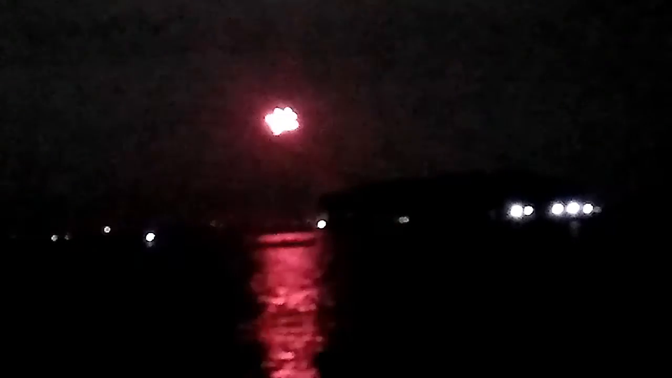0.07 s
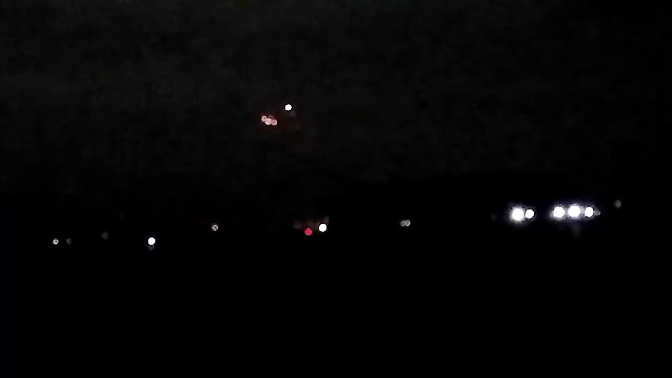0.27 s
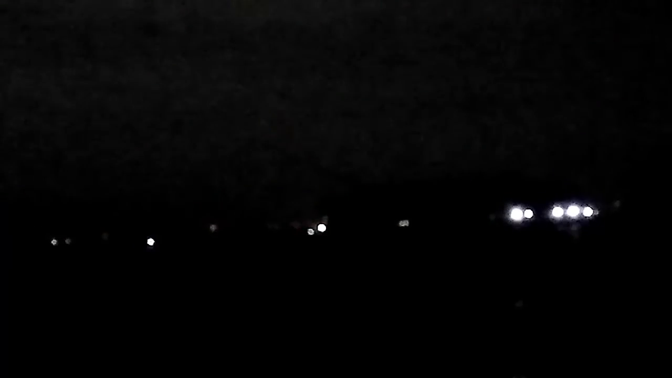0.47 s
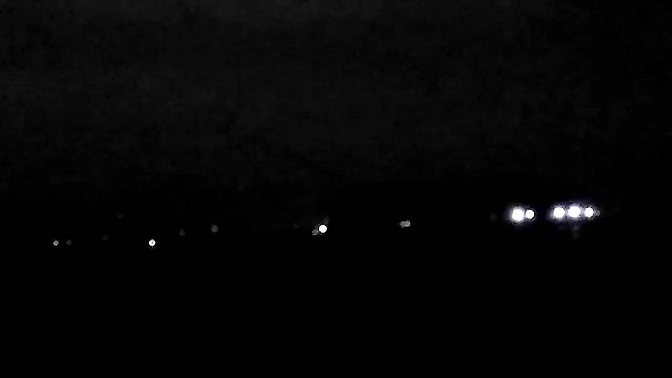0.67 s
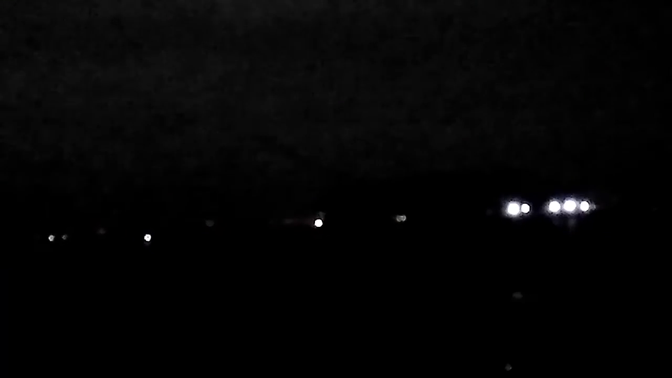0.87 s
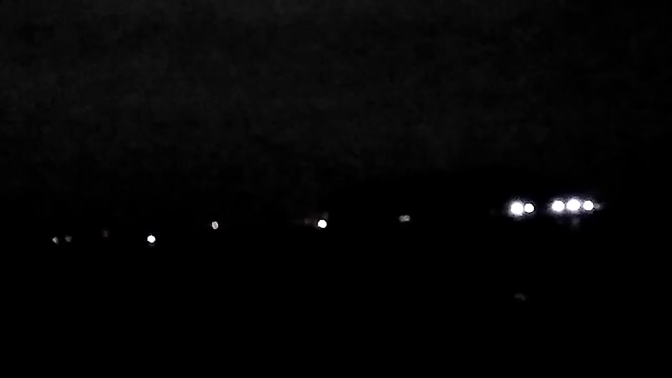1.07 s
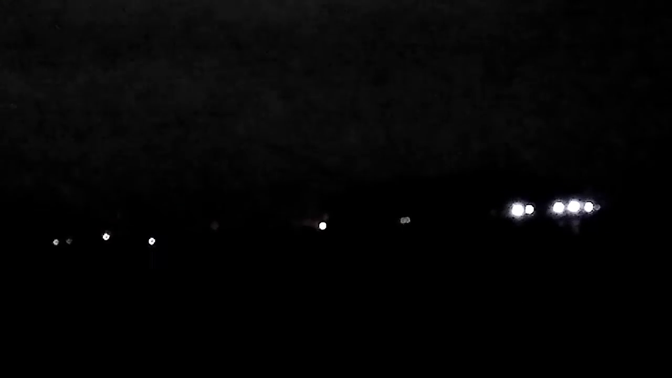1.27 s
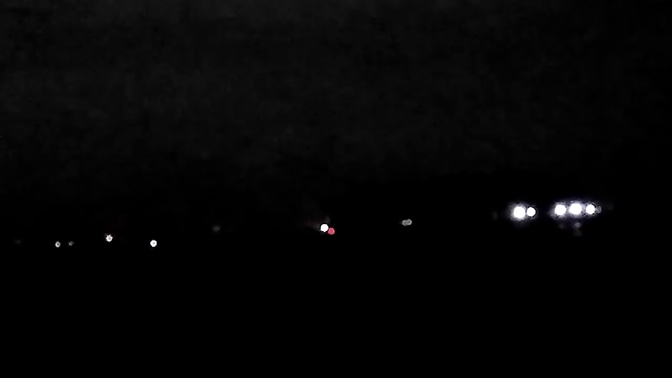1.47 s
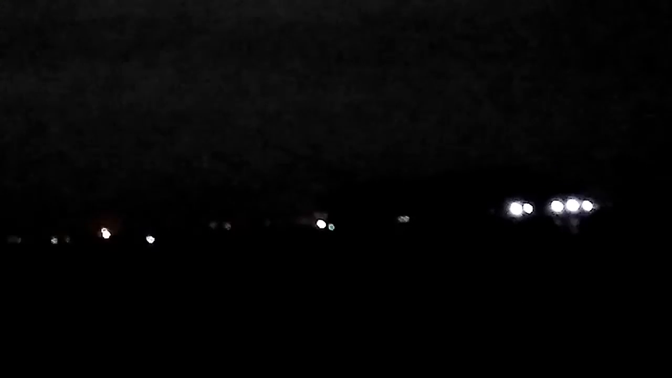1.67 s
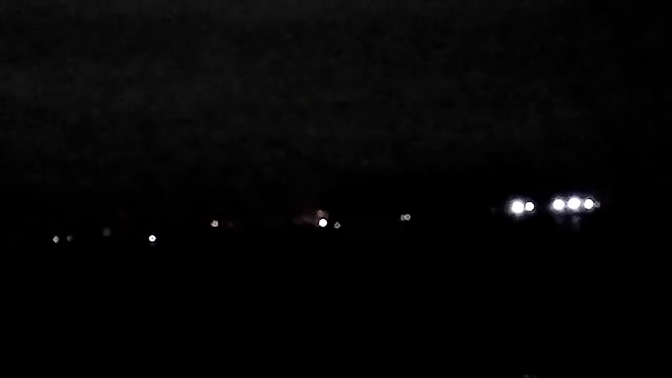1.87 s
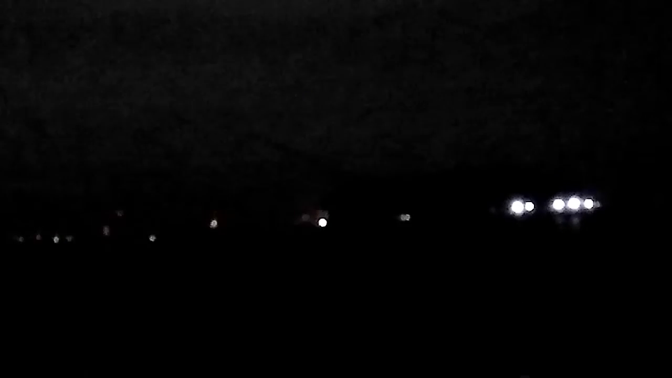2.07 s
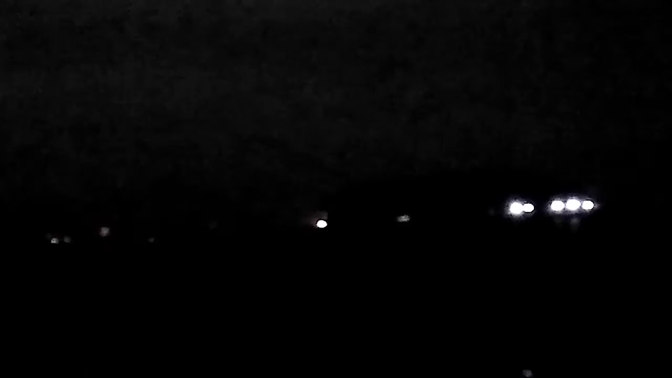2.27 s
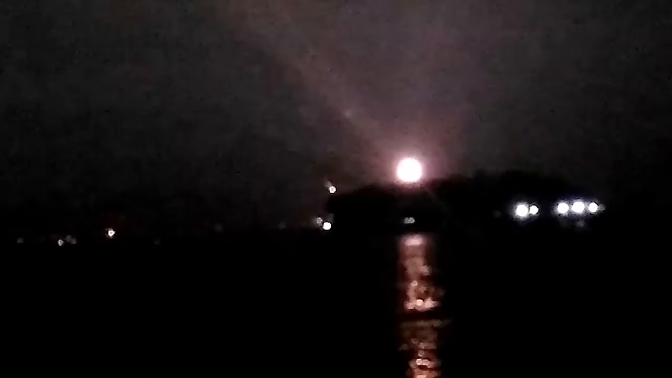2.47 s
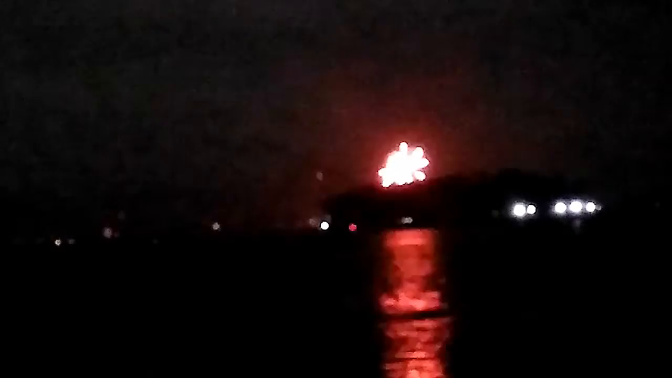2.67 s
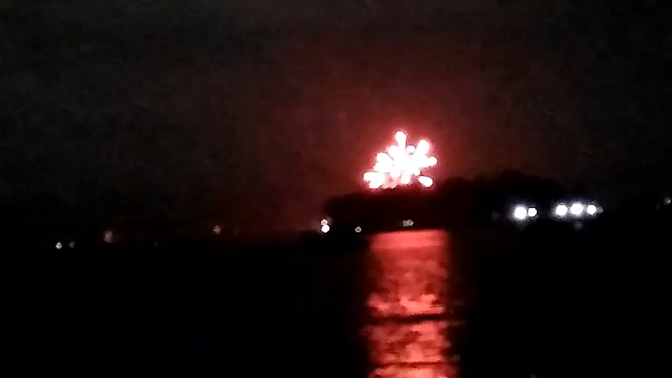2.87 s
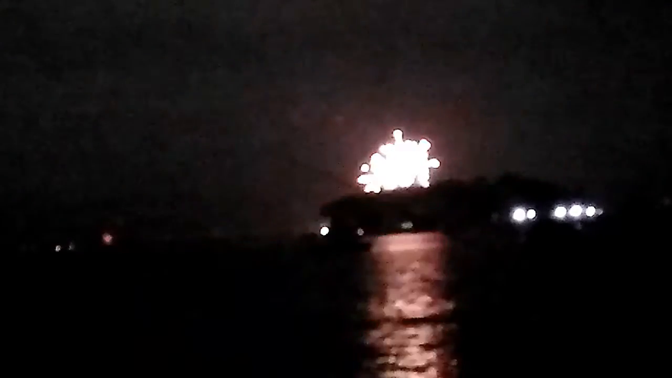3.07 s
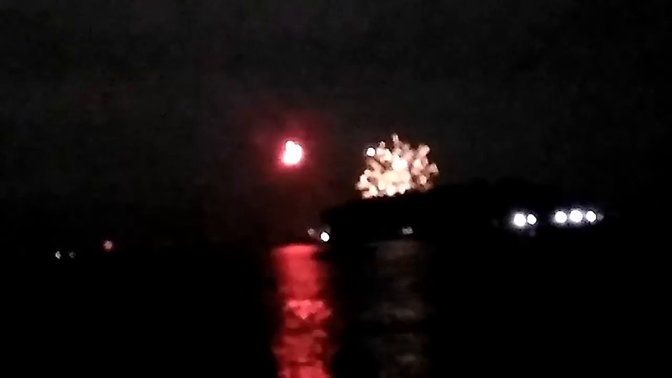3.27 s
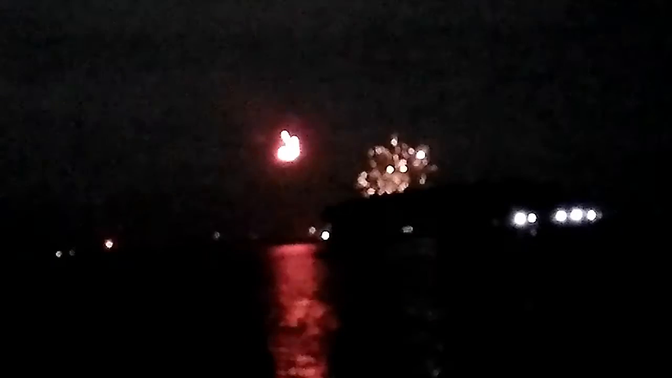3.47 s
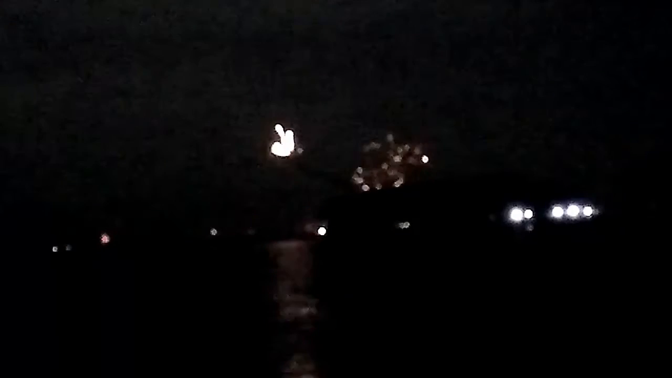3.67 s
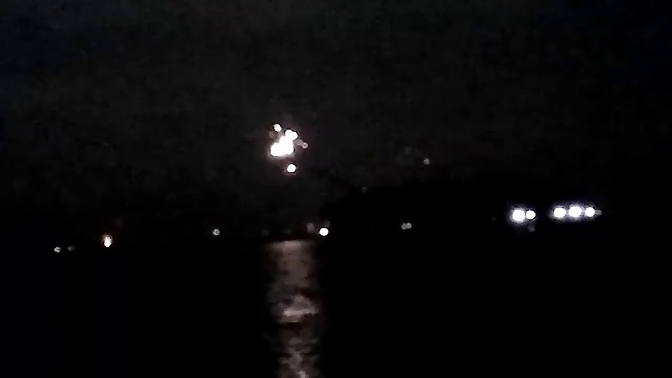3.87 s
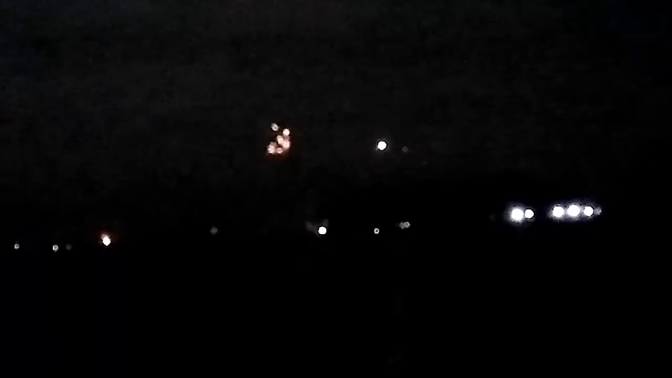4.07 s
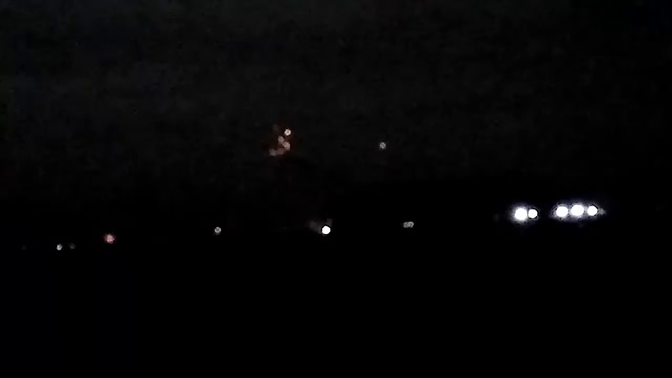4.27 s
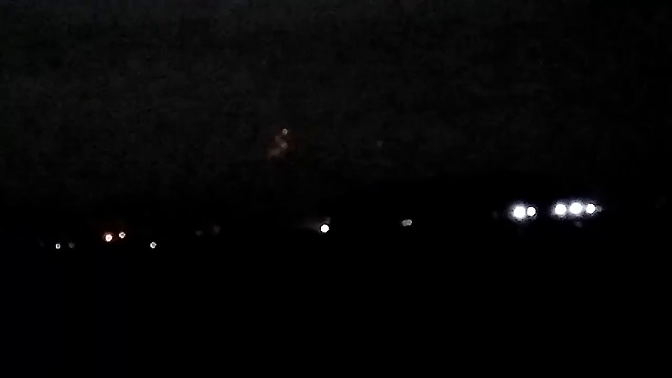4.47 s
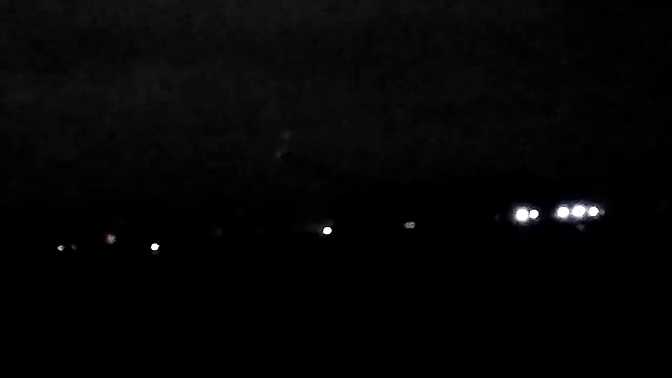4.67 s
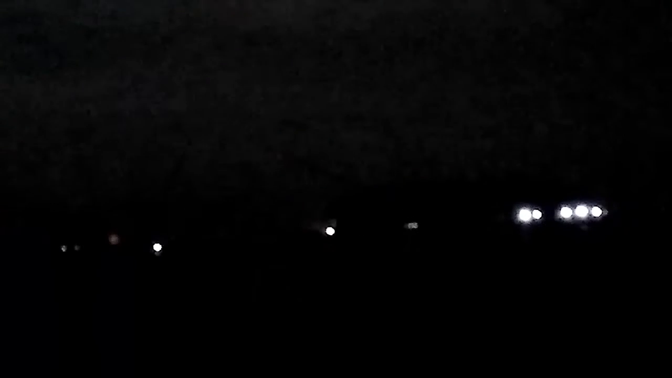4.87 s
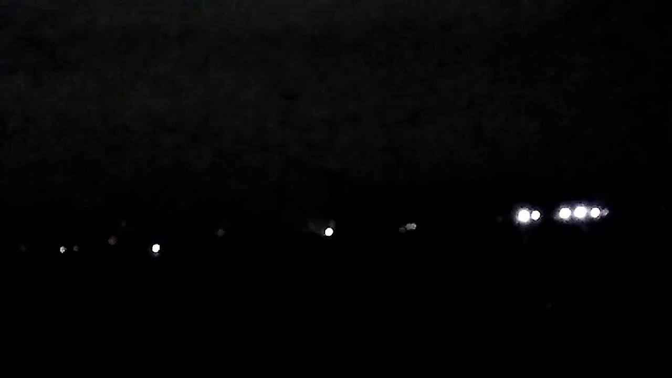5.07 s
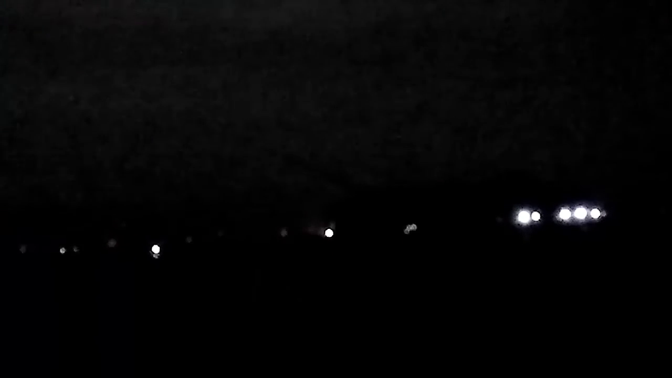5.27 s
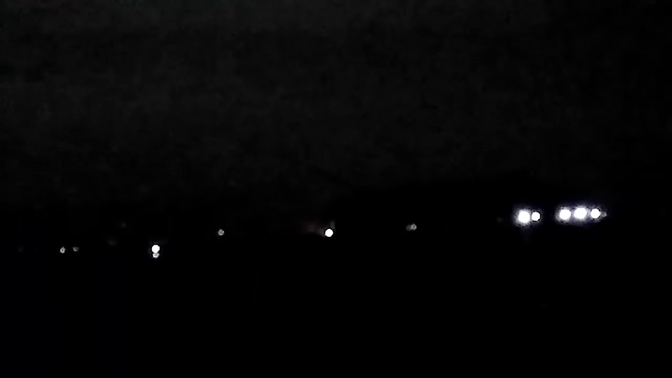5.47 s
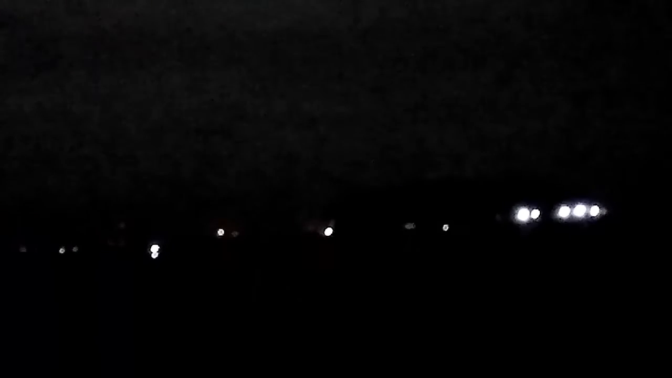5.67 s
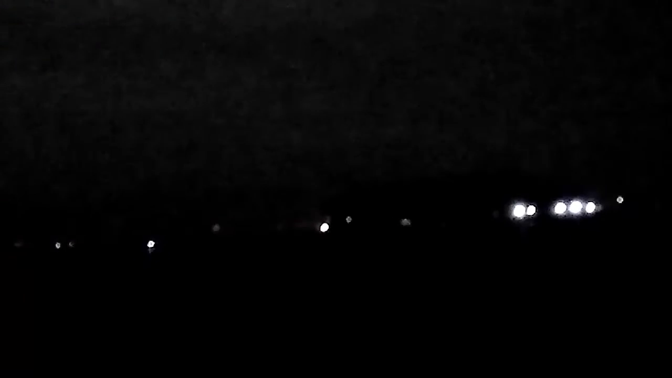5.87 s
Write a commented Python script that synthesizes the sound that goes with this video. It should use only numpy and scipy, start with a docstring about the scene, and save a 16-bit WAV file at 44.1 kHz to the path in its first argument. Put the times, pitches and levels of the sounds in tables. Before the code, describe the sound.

From an idling boat, scattered firework bangs with rolling echoes, dull thumps and a late crackling volley over steady low rumble.

```python
"""A low rumble and the ticking of an idling motor, dull thumps, then firework shells bursting over water at night.
Heard from a boat: each burst is an N-wave plus its reflection off the water, a boom, scatter and a bank echo.
Stars snap and fizz as shaped noise; thumps and low echoes are swelling sines; motor clicks ring a bank of modes.
Behind them: faint insects made of gliding sine strokes, and filtered noise for the rumble and night air."""
import sys
import numpy as np
from scipy import signal
from scipy.fft import rfft, irfft
from scipy.io import wavfile

SR = 44100
rng = np.random.default_rng(int(sys.argv[2]) if len(sys.argv) > 2 else 0)


def put_to_file(sound):
    """Save the sound as 16-bit audio at rate SR, in the file named by the first command-line argument."""
    columns = np.atleast_2d(sound).T  # one column per channel
    safe = np.clip(columns, -1, 1)
    whole_steps = np.round(safe * 32767)
    wavfile.write(sys.argv[1], SR, whole_steps.astype(np.int16))


N = 260190
TIME_S = np.arange(N) / SR

# Shell bursts: (start [s], blast level [dB], N-wave length [ms], front low-pass [Hz],
#   water reflection lag [ms], reflection level [dB], boom level [dB], low edge [Hz],
#   ragged crack level [dB], bass, low and high tail levels [dB], bank echo slap level [dB])
SHELL_BURSTS = [(1.533, -8.5, 0.95, 6100, 1.345, 3, 1.5, 138, -20, -45, -34, -34, -18.5),
                (4.2977, -9, 2.3, 1190, 0.54, -26, 6, 83.6, -22.5, -27.5, -34, -35, -15.5),
                (4.8923, -11.5, 1.1, 5200, 1.068, -1.5, 3, 139.5, -10, -40, -35.5, -35, -18),
                (4.954, -10.5, 1.14, 1180, 0.38, 2.5, -10.5, 180, -23.5, -46, -53, -37, -26)]
# Scatter off boat and trees: (frequency [Hz], boat level [dB per Hz], boat t60 [s],
#   trees level [dB per Hz], trees t60 [s]); levels relative
SCATTER_BANDS = [(82.6, 11.5, 0.17, -0.5, 0.2), (200, -1, 0.33, 3, 3.3), (394, -3.5, 0.53, -0.5, 1.4),
                 (676, -12, 0.38, -5.5, 1.36), (1550, -9, 0.032, -11.5, 1.22),
                 (2750, -11, 0.22, -13.5, 0.76), (5340, -28, 0.09, -29, 0.21), (9900, -41, 0.18, -54, .6),
                 (16000, -47, .14, -40, .5)]
BANK_DELAY_S = 0.1744

# Single snaps of burning stars, and one echo slap after the last burst: (time [s], relative level [dB])
SINGLE_SNAPS = [(1.6487, -25), (4.8272, -26), (4.869, -27), (5.1385, -28), (5.4639, -27.5), (5.5467, -21)]
# More snaps, of like loudness, bunch into a volley; level relative, as in SINGLE_SNAPS
VOLLEY_PEAK_S, VOLLEY_WIDTH_S = 5.62, 0.045
VOLLEY_DB, VOLLEY_FADE_DB_PER_S, VOLLEY_SPREAD_DB = -25, 31, 2

# Spells of fizz: (peak time [s], rise [s], fall [s], crackle level [dB], spray level [dB])
FIZZ_SPELLS = [(1.68, .18, 0.29, -69, -58.5), (2.66, .12, 0.18, -52, -61), (3.43, .17, 0.15, -82, -65),
               (4.1, 0.21, 0.079, -55.5, -65), (4.98, 0.18, 0.35, -45.5, -72),
               (5.65, 0.19, 0.19, -46, -60.5)]
CRACKLE_REST_DB, SPRAY_REST_DB = -67.5, -69.5  # between the spells
# Fizz spectra: (frequency [Hz], relative level [dB per Hz])
CRACKLE_SPECTRUM = [(500, 12), (800, 11.5), (1400, 1), (2800, 12.5), (4500, -4.5), (7000, -9), (15000, -24)]
SPRAY_SPECTRUM = [(3000, 10.5), (6000, 1.5), (10000, 8.5), (12000, -4), (16000, -18)]

# Loudest dull thumps, and low echoes just after the bursts and from the bank:
#   (peak time [s], relative level [dB], pitch [Hz])
THUMPS_AND_ECHOES = [(0.98, -32.5, 144), (1.266, -28.5, 189), (1.577, -21, 293), (1.591, -23.5, 350),
                     (1.606, -25, 504), (2.101, -29.5, 173), (2.506, -28, 148), (2.660, -30, 200),
                     (2.825, -28.5, 285), (3.755, -23.5, 198), (4.319, -18.5, 303), (4.35, -23.5, 286),
                     (4.4758, -18, 220), (4.55, -23.5, 210), (4.66, -22.5, 200), (5.104, -24.5, 182),
                     (5.504, -26.5, 223)]
# Softer thumps; level relative, as in THUMPS_AND_ECHOES; pitch spread is +/- octaves
SOFT_THUMP_DB, SOFT_THUMP_HZ, SOFT_THUMP_OCTAVES = -35, 185, 0.3

# Ring of the motor's clicks: (frequency [Hz], relative level [dB], t60 [s])
MOTOR_MODES = [(854, -12, 0.016), (1063, -11, 0.058), (1510, -2.5, 0.0038), (2093, -3.5, 0.011),
               (2393, -2.5, 0.01), (2843, -5.5, 0.015), (3510, -11, 0.0092), (5840, -12, 0.00081)]
# How hard the motor ticks: (time [s], relative level [dB])
TICK_STRENGTH = [(.09, -42), (.19, -32), (.3, -32), (.42, -45), (.72, -33.5), (1.02, -40.5), (1.34, -35),
                 (2.05, -35), (2.24, -44.5), (2.58, -39.5), (2.88, -41.5), (2.99, -31), (3.19, -43.5),
                 (3.4, -29), (3.5, -33), (3.69, -28), (4.17, -47), (5.9, -49)]
# One tick a turn; each turn is slightly shorter than the last
FIRST_TICK_S, TURN_S, TURN_SHORTENS_S, TICK_JITTER_S = 0.0922, 0.1038, 0.000027, 0.00028

INSECT_THROB_HZ = 9.9

# Background spectra: (frequency [Hz], relative level [dB per Hz])
RUMBLE_SPECTRUM = [(15, -61), (25, -24), (32, -17), (45, -22), (59, -8), (151, -1), (230, -3), (267, -7.5),
                   (357, -16), (397, -15), (460, -20.5), (600, -28), (780, -29), (1320, -120)]
AIR_SPECTRUM = [(400, 2.5), (600, 0), (1080, 1), (1800, -2), (2600, -4.5), (3400, -4), (4500, -20.5),
                (5700, -25.5), (7200, -11), (8000, -29), (11000, -24.5), (12500, -34), (15000, -30),
                (16000, -48)]
# Swells of the rumble: (peak time [s], rise [s], fall [s], added level [dB])
RUMBLE_SWELLS = [(.95, 0.091, 0.055, 2.6), (2.88, 0.09, 0.21, 7.6), (4.72, 0.47, 0.42, 4.2),
                 (5.52, 0.1, 0.32, 5)]
RUMBLE_STEADY_DB = -41.5

# Microphone colour: (frequency [Hz], width [Hz], gain [dB])
MIC_PEAKS = [(1073, 160, -6), (2900, 300, 1.5), (3240, 1010, -7), (4400, 740, 0.5)]
CUTOFF_HZ = 15900


def shells(boom_hz, boom_t60_s, bank_db):
    """Each blast makes the boat boom; the bank returns it weaker, its front smeared into a slap."""
    out, t_s = np.zeros(N), TIME_S[:SR // 8]
    for (start_s, blast_db, length_ms, front_hz, lag_ms, mirror_db,
         boom_db, edge_hz, crack_db, *_, slap_db) in SHELL_BURSTS:
        wave = blast(t_s, length_ms, front_hz, lag_ms, mirror_db)
        boom = ring(wave, boom_hz, boom_t60_s)
        boom = from_db(boom_db) * boom / np.abs(boom).max()
        # bigger shells reach deeper
        direct = from_db(blast_db) * cut(wave - boom, edge_hz, "high")
        ragged = from_db(crack_db) * crack(t_s, low_hz=2250, high_hz=3980, decay_s=0.0016)
        add(out, start_s, direct + ragged)
        slap = from_db(slap_db) * crack(t_s, low_hz=870, high_hz=2220, decay_s=0.0047)
        echo = from_db(bank_db) * cut(direct, 570, "low", order=1)
        add(out, start_s + BANK_DELAY_S, slap + echo)
    return out


def blast(t_s, length_ms, front_hz, lag_ms, mirror_db):
    """An N-wave and its reflection off the water, the fronts softened by the air."""
    reflection = from_db(mirror_db) * n_wave(t_s - lag_ms / 1000, length_ms)
    return cut(n_wave(t_s, length_ms) + reflection, front_hz, "low", order=1)


def n_wave(t_s, length_ms):
    """Pressure jumps up, falls through zero and jumps back."""
    phase = t_s / (length_ms / 1000)
    return (1 - 2 * phase) * (phase >= 0) * (phase < 1)


def crack(t_s, low_hz, high_hz, decay_s):
    """A band of noise that decays exponentially; peak 1."""
    snap = cut(rng.standard_normal(len(t_s)) * np.exp(-t_s / decay_s), [low_hz, high_hz], "band")
    return snap / np.abs(snap).max()


def tails(boat_db, trees_db, trees_peak_s, trees_rise_power, grain_db):
    """Boat scatter decays from the burst; tree scatter swells first; each band has its own decay."""
    out, t_s = np.zeros(N), TIME_S[:SR * 3 // 2]
    edges_hz = np.geomspace(58, 16000, 18)
    trees_rise = np.minimum(t_s / trees_peak_s, 1) ** trees_rise_power
    trees_age_s = np.maximum(t_s - trees_peak_s, 0)
    for start_s, *_, bass_db, low_db, high_db, _ in SHELL_BURSTS:
        # some branches throw back more than others
        grain = from_db(grain_db * rms_one(cut(rng.standard_normal(len(t_s)), 110, "low")))
        noises = rng.standard_normal((2, len(t_s))) * grain
        for k, (low_hz, high_hz) in enumerate(zip(edges_hz, edges_hz[1:])):
            hz = np.sqrt(low_hz * high_hz)
            near_db, near_t60_s, far_db, far_t60_s = at_hz(SCATTER_BANDS, hz)
            near = from_db(boat_db + near_db - 60 * t_s / near_t60_s) * np.minimum(t_s / 0.005, 1)
            far = from_db(trees_db + far_db - 60 * trees_age_s / far_t60_s) * trees_rise
            level_db, = at_hz([(100, bass_db), (400, low_db), (1500, high_db)], hz)
            # neighbouring bands take different noise
            band = cut(noises[k % 2], [low_hz, high_hz], "band")
            add(out, start_s, from_db(level_db) * np.hypot(near, far) * band)
    return out


def snaps(gain_db):
    """Snaps of burning stars and one echo slap, each a crack with a short sputter of noise."""
    out, t_s = np.zeros(N), TIME_S[:SR // 25]
    for start_s, level_db in SINGLE_SNAPS + volley(count=12):
        snap = crack(t_s, low_hz=1890, high_hz=3300, decay_s=0.0038)
        sputter = from_db(-14.5) * crack(t_s, low_hz=2200, high_hz=4840, decay_s=0.02)
        add(out, start_s, from_db(level_db + gain_db) * (snap + sputter))
    return out


def volley(count):
    """Times and levels of a run of snaps, densest and loudest in the middle."""
    when, size = rng.random((count, 2)).T
    share = (np.arange(count) + 0.5 + when) / (count + 1)
    # the inverse logistic curve crowds the middle
    offset_s = VOLLEY_WIDTH_S * np.log(share / (1 - share))
    level_db = VOLLEY_DB - VOLLEY_FADE_DB_PER_S * np.abs(offset_s)
    level_db = level_db + VOLLEY_SPREAD_DB * (2 * size - 1)
    return list(zip(VOLLEY_PEAK_S + offset_s, level_db))


def fizz(grain_db, grain_hz):
    """Lumpy noise sizzle with a finer noise spray on top, coming and going in spells."""
    crackle_level, spray_level = from_db(CRACKLE_REST_DB), from_db(SPRAY_REST_DB)
    for peak_s, rise_s, fall_s, crackle_db, spray_db in FIZZ_SPELLS:
        spell = hump(peak_s, rise_s, fall_s)
        crackle_level = np.hypot(crackle_level, from_db(crackle_db) * spell)
        spray_level = np.hypot(spray_level, from_db(spray_db) * spell)
    grain = rms_one(cut(rng.standard_normal(N), grain_hz, "low"))
    lumps = from_db(grain_db * np.clip(grain, -2, 2))
    crackle = coloured(rng.standard_normal(N) * lumps, CRACKLE_SPECTRUM)
    spray = coloured(rng.standard_normal(N), SPRAY_SPECTRUM)
    return crackle_level * crackle + spray_level * spray


def thumps(rise_cycles, gain_db, soft_count):
    """Dull thumps and low burst echoes: sines of a few cycles that swell and die, plus soft scattered ones."""
    out, t_s = np.zeros(N), TIME_S[:SR // 8]
    soft = []
    # one soft thump at random within each equal slot
    for k, (when, pitch) in enumerate(rng.random((soft_count, 2))):
        hz = SOFT_THUMP_HZ * 2 ** (SOFT_THUMP_OCTAVES * (2 * pitch - 1))
        soft.append(((k + when) / soft_count * N / SR, SOFT_THUMP_DB, hz))
    for peak_s, level_db, hz in THUMPS_AND_ECHOES + soft:
        age = t_s * hz / rise_cycles
        swell = (age * np.exp(1 - age)) ** 2
        thump = swell * np.sin(2 * np.pi * hz * t_s)
        add(out, max(peak_s - rise_cycles / hz, 0), from_db(level_db + gain_db) * thump)
    return out


def motor(tick_db, knock_db, knock_hz, return_s, rattle_db, rattle_s, snap_db):
    """Each turn knocks out and back, with a sharp tick on the first knock; the clicks ring the modes."""
    clicks, t_s = np.zeros(N), TIME_S[:SR // 25]
    for start_s, strength_db in turns():
        rattle = from_db(rattle_db) * rng.standard_normal((3, len(t_s))) * np.exp(-t_s / rattle_s)
        tick, knock_out, knock_back = (t_s == 0) + rattle
        add(clicks, start_s, from_db(strength_db + tick_db) * cut(tick, 880, "high", order=1))
        add(clicks, start_s, from_db(knock_db) * cut(knock_out, knock_hz, "low"))
        add(clicks, start_s + return_s, from_db(knock_db) * cut(knock_back, knock_hz, "low"))
    body = np.zeros(N)
    for k, (hz, mode_db, t60_s) in enumerate(MOTOR_MODES):
        body += (-1) ** k * from_db(mode_db) * ring(clicks, hz, t60_s)
    return body + from_db(snap_db) * clicks


def turns():
    """Time [s] and relative strength [dB] of the motor's tick on each turn."""
    k = np.arange(int(N / SR / TURN_S) + 1)
    start_s = FIRST_TICK_S + k * (TURN_S - TURN_SHORTENS_S * k / 2)
    start_s = start_s + TICK_JITTER_S * rng.standard_normal(len(k))
    return zip(start_s, np.interp(start_s, *np.transpose(TICK_STRENGTH)))


def insects(level_db, top_hz, spread_hz, fall_hz, stroke_s, throb_db, count):
    """A throbbing chorus of short wing strokes, each a sine sliding down in pitch."""
    out, t_s = np.zeros(N), TIME_S[:int(stroke_s * SR)]
    for when, pitch, size in rng.random((count, 3)):
        hz = top_hz - spread_hz * pitch - fall_hz * t_s / stroke_s
        stroke = np.sin(np.pi * t_s / stroke_s) * np.sin(2 * np.pi * np.cumsum(hz) / SR)
        add(out, when * N / SR, from_db(8.4 * size - 6 * pitch) * stroke)
    throb = from_db(throb_db * np.sin(2 * np.pi * INSECT_THROB_HZ * TIME_S))
    return from_db(level_db) * rms_one(out * throb)


def background(air_db):
    """Noise shaped into a low rumble that wavers and swells, and the even hush of the night."""
    waver = from_db(2.75 * rms_one(cut(rng.standard_normal(N), 14.2, "low")))
    rumble = waver * cut(coloured(rng.standard_normal(N), RUMBLE_SPECTRUM), 687, "low", order=4)
    air = cut(coloured(rng.standard_normal(N), AIR_SPECTRUM), 442, "high", order=4)
    swell_db = sum(db * hump(peak_s, rise_s, fall_s) for peak_s, rise_s, fall_s, db in RUMBLE_SWELLS)
    return from_db(RUMBLE_STEADY_DB + swell_db) * rumble + from_db(air_db) * air


def from_db(db):
    """Decibels to gain."""
    return 10 ** (np.asarray(db) / 20)


def rms_one(x):
    """Scale to rms 1."""
    return x / np.sqrt(np.mean(x ** 2) + 1e-20)


def at_hz(rows, hz):
    """Each column of a spectrum table at these frequencies, interpolated over log frequency."""
    table_hz, *columns = np.transpose(rows)
    return [np.interp(np.log(hz + 1e-3), np.log(table_hz), column) for column in columns]


def cut(x, hz, kind, order=2):
    """Butterworth filter."""
    sos = signal.butter(order, np.clip(hz, 10, 0.45 * SR), kind, fs=SR, output="sos")
    return signal.sosfilt(sos, x + 1e-18)


def ring(clicks, hz, t60_s):
    """Two-pole resonator: a unit click sets a decaying sine of height 1 ringing."""
    radius, angle = from_db(-60 / (t60_s * SR)), 2 * np.pi * hz / SR
    poles = [1, -2 * radius * np.cos(angle), radius * radius]
    return signal.lfilter([0, np.sin(angle)], poles, clicks + 1e-18)


def coloured(x, spectrum):
    """Give a steady sound this spectrum; rms 1."""
    gain_db = at_hz(spectrum, np.fft.rfftfreq(N, 1 / SR))[0]
    return rms_one(irfft(rfft(x) * from_db(gain_db), N))


def hump(peak_s, rise_s, fall_s):
    """A smooth swell to 1 and back, Gaussian on each side."""
    return np.exp(-((TIME_S - peak_s) / np.where(TIME_S < peak_s, rise_s, fall_s)) ** 2)


def add(out, start_s, sound):
    """Mix a sound in from start_s on."""
    at = int(round(start_s * SR))
    out[at:at + len(sound)] += sound[:max(N - at, 0)]


def scene():
    """Bursts and their echoes over thumps, motor, insects and background."""
    bursts = shells(boom_hz=232, boom_t60_s=0.02, bank_db=-18.5)
    bursts = bursts + snaps(gain_db=-7) + fizz(grain_db=5.0, grain_hz=127)
    echoes = tails(boat_db=25.5, trees_db=11.5, trees_peak_s=0.19, trees_rise_power=0.63, grain_db=2.0)
    ticking = motor(tick_db=3.5, knock_db=-34.0, knock_hz=1500, return_s=0.0725,
                    rattle_db=-23.0, rattle_s=0.0062, snap_db=-13)
    chorus = insects(level_db=-68.5, top_hz=7740, spread_hz=660, fall_hz=564,
                     stroke_s=0.0146, throb_db=-4.0, count=800)
    low_thumps = thumps(rise_cycles=0.853, gain_db=3.5, soft_count=18)
    return (bursts + echoes + ticking + chorus + low_thumps + background(air_db=-53.0))[None]


def record(dry):
    """A small microphone loses the deepest bass and colours the middle; peaks are rounded, the top is cut."""
    heard = cut(dry, 55, "high")
    for hz, width_hz, gain_db in MIC_PEAKS:
        peak = signal.lfilter(*signal.iirpeak(hz, hz / width_hz, fs=SR), heard)
        heard = heard + (from_db(gain_db) - 1) * peak
    rounded = np.tanh(heard)
    return signal.sosfilt(signal.ellip(10, 0.1, 80, CUTOFF_HZ, fs=SR, output="sos"), rounded)


dry = scene()
out = record(dry)
put_to_file(out)
```